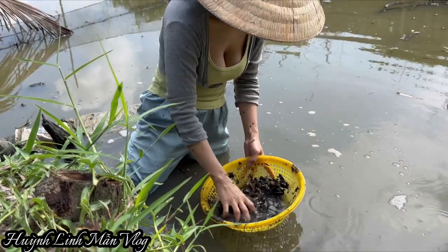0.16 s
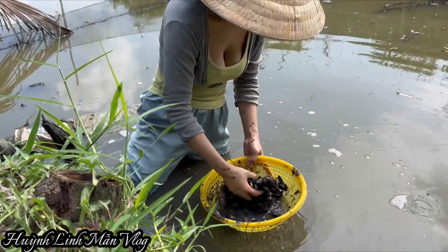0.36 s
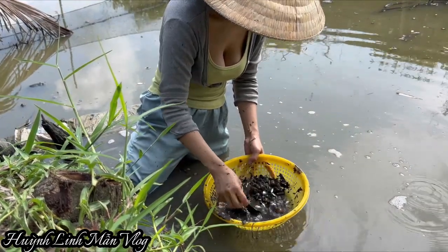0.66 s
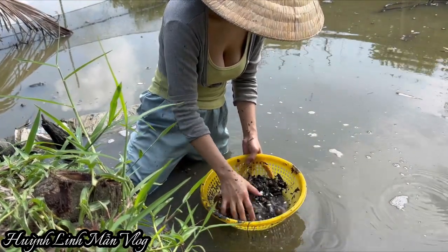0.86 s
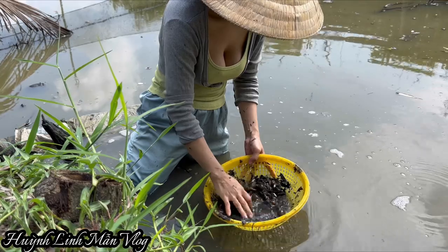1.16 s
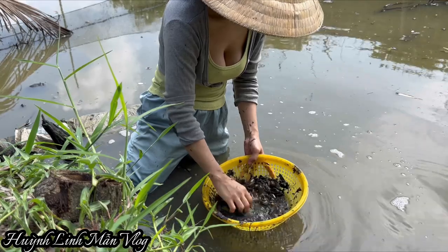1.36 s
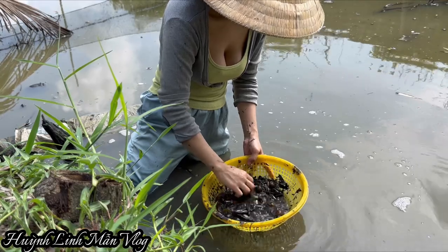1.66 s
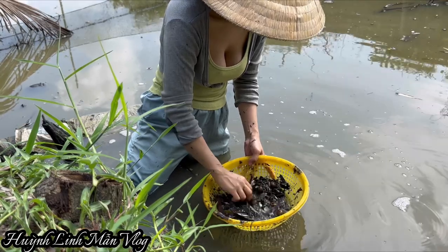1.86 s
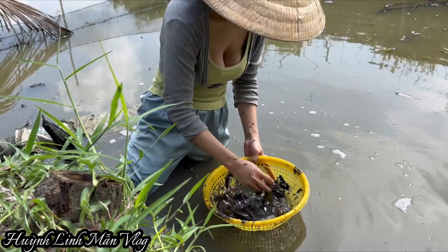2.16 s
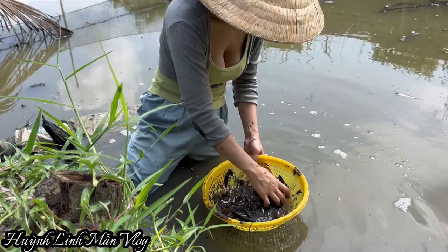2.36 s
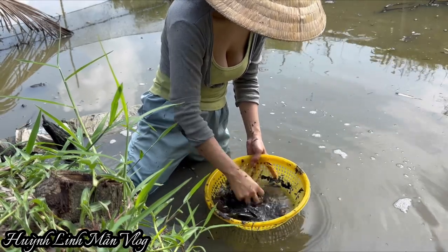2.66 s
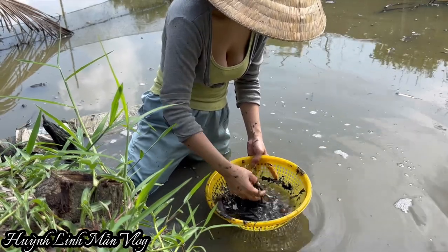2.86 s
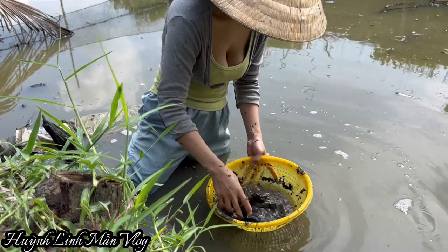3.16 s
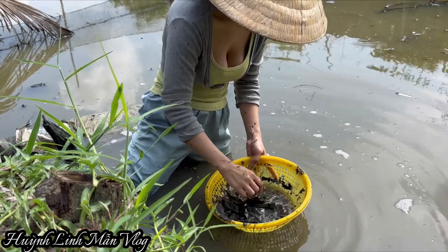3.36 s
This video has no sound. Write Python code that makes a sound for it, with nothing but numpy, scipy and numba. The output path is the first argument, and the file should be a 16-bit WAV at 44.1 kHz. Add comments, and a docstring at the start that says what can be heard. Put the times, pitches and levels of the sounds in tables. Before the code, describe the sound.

Mud is worked by hand in a basket at a pond, close to the microphone, clicking and popping in bursts; early bird whistles, a far motor winding down, later a faint rasping call.

```python
"""A shallow pond, close by: hands knead mud in a plastic basket.
Wet clicks, pops and crackle come in bursts, built from swelling, dying sines and short cracks of hiss.
A small engine drones far off and slows: wavering multiples of its firing rate over rumble noise.
Birds call from the banks as gliding sines and a rasp of resonant noise; the air is soft coloured hiss.
A gain control dips the level after loud peaks and recovers in a quick and a slow part."""
import sys
import numpy as np
from scipy import signal
from scipy.fft import rfft, irfft
from scipy.io import wavfile
from scipy.ndimage import uniform_filter1d
from numba import njit

SR = 44100
rng = np.random.default_rng(int(sys.argv[2]) if len(sys.argv) > 2 else 0)


def store_pcm(level_fs):
    """Save levels as 16-bit WAV."""
    pcm = np.round(np.clip(level_fs, -1, 1) * 32767).astype(np.int16)
    wavfile.write(sys.argv[1], SR, np.atleast_2d(pcm).T)


N = 154350

# far engine: t/s, firing rate f/Hz, level/dB, tones against rumble level/dB
ENGINE_RUN = [(0, 37.14, -26, -6), (.12, 37.65, -31, 4), (.47, 38.74, -28, 1.5), (.58, 38.49, -28.5, 1),
              (.9, 39.5, -28, 0), (1.3, 40, -27, -2), (1.45, 37.38, -29, 1.5), (1.7, 32.06, -28.5, -2),
              (1.9, 27.5, -30, 1.5), (2.1, 24.16, -30.5, 3), (2.45, 20.96, -29.5, -6.5),
              (3.5, 22.03, -32, -5)]
# engine tones: multiple of the firing rate, relative level/dB
ENGINE_ORDERS = [(2, 5), (3, -5), (4, -14), (5, -19.5), (6, -12), (8, -22), (9, -25)]
# change of each multiple once off the throttle: level/dB
COASTING_CHANGES = [-12.5, 5, 12.5, 14, -11.5, -10, -15.5]
COASTING_S, COASTING_FADE_S = 1.228, 0.57  # start and length of the change
ENGINE_WAVER_DB = 3
# spectrum of the engine's rumble: f/Hz, density level/dB
RUMBLE_SPECTRUM = [(24, -36), (36, -0.5), (55, 0.5), (70, 2.5), (125, -1.5), (150, -7.5), (183, -9.5),
                   (247, -14.5), (410, -23.5), (700, -28.5), (910, -35.5), (1540, -120)]
RUMBLE_DB = -3  # against the engine's level
# spectrum of the air hiss: f/Hz, density level/dB
AIR_SPECTRUM = [(240, -37), (400, 8.5), (852, -20.5), (906, -8), (1990, -15), (3070, -9.5), (3530, -10),
                (4880, -18), (6150, -5), (10400, -35), (16000, -5)]
AIR_DB = -49
# whistled calls: start t/s, length t/s, base pitch f/Hz, base level/dB
WHISTLE_CALLS = [(-.14, 0.2, 1292, -29.5), (0.125, .19, 1304, -29.5), (0.386, .2, 1304, -28.5),
                 (0.663, 0.17, 1219, -30)]
# contour within one call: share of its length, pitch ratio, added level/dB
WHISTLE_CONTOUR = [(0, .87, -16), (0.091, .96, -0.5), (0.2, 1.01, 6.5), (0.299, .98, 2.5), (.41, .89, -0.5),
                   (0.521, 1.02, 2.5), (.62, 1.13, 12), (.76, .96, 5), (.92, 0.8, -10), (1, 0.65, -34)]
WHISTLE_PAN_DB, WHISTLE_PHASE = -5, -2.88  # left over right; radians by which left leads
WHISTLE_ECHO_DB, WHISTLE_ECHO_S = -11, 0.41  # echo level; time to fall 60 dB
# squelches, each a swarm of bubbles: start t/s, length t/s, level/dB, centre pitch f/Hz
SQUELCH_SWARMS = [(-.1, 0.94, -49.5, 2216), (0.404, 0.19, -37.5, 3100), (0.883, 0.3, -42.5, 2460),
                  (1.137, 0.21, -37, 2620), (1.274, 0.2, -44, 1785), (1.458, 0.48, -50, 2815),
                  (1.776, 0.28, -56.5, 1567), (2.276, 0.086, -43.5, 2490), (2.349, 0.2, -37.5, 3290),
                  (2.489, 0.12, -35.5, 3380), (2.54, 0.47, -50, 3180), (2.81, 0.15, -55, 2810),
                  (3.118, 0.086, -46, 2840), (3.38, 0.33, -51.5, 3604)]
SEEP_DB, SEEP_HZ = -59, 3000  # crackle that goes on between squelches
GRAINS_PER_S, GRAIN_SPREAD_DB, GRAIN_OCTAVES = 2600, 3.6, .75
GRAIN_CYCLES, GRAIN_RISE = 2.8, .71  # typical decay and swell, in cycles
GRAIN_GLIDE = .012  # pitch climb per cycle, as a share
SCATTER_DB = -1.5  # left-right spread
FIZZ_DB, FIZZ_HZ = -4, 10500  # ticks: level against the bubbles, middle pitch
# wet clicks and pops: t/s, ring level/dB, pitch f/Hz, crack level before its lift/dB, cycles to fall to 1/e^2
POP_HITS = [(0.187, -15, 653, -61, 4.5), (0.203, -13.5, 1310, -43.5, 2.1), (0.303, -1, 2180, -46, 2.4),
            (0.379, -33, 1380, -37.5, 2.9), (0.407, -41, 1320, -38.5, 3.3), (0.439, -20, 1800, -50, 1.5),
            (0.455, -22, 3500, -42, 3.3), (.491, -20.5, 730, -40, 5.4), (.4985, -9, 4500, -15, 3.6),
            (0.542, -27, 1140, -31, 3.8), (0.572, -15.5, 1260, -44, 2.6), (0.733, -23.5, 2470, -47, 5),
            (0.786, -31, 2100, -55, 6), (0.877, -26.5, 721, -43, 3), (0.917, -16.5, 3600, -42, 4.8),
            (0.932, -8, 2400, -36, 1.7), (0.966, -15.5, 1950, -68, 11.7), (1, -20, 1740, -35, 10),
            (1.041, -13, 1310, -60, 2.3), (1.138, -24, 2900, -60, 4.5), (1.157, -9, 1290, -63, 2.1),
            (1.158, -14, 4100, -59, 4.17), (1.173, -22, 1204, -60, 4), (1.196, -21, 1210, -38, 8.4),
            (1.207, -24, 1300, -45, 4.5), (1.212, -19, 2440, -49, 4.2), (1.226, -12.5, 3580, -53, 3.8),
            (1.236, -21, 1270, -54, 4.2), (1.254, -19, 3060, -57, 4.3), (1.279, -14, 4100, -38, 4.6),
            (1.295, -15, 2930, -35, 6.76), (1.2959, -19, 1020, -60, 4.7), (1.318, -25, 1760, -66, 4.7),
            (1.331, -18.5, 1450, -60, 3.7), (1.35, -25, 1302, -61, 6.6), (1.365, -18, 1420, -59, 3.6),
            (1.378, -21, 2250, -60, 6), (1.389, -31, 751, -67, 6.5), (1.563, -28, 2520, -33, 4),
            (1.628, -25, 3060, -56, 4.3), (1.649, -18, 4240, -50, 3.6), (1.674, -20.5, 1750, -41, 4.2),
            (1.683, -36, 8980, -30, 4.3), (1.721, -20.5, 1211, -45, 2.4), (1.738, -17.5, 2670, -53, 2.7),
            (1.81, -21, 1216, -69, 4.6), (1.824, -27, 1870, -71, 4.2), (1.845, -23, 3900, -77, 4),
            (2.193, -12, 9000, -51, 2.9), (2.208, -38, 2600, -34, 4.4), (2.284, -21, 2510, -54, 4.03),
            (2.3, -18.5, 1240, -45, 3.8), (2.309, -19, 2552, -33, 3.3), (2.351, -19, 3800, -51, 4.3),
            (2.363, -4, 4450, -41, 4), (2.369, -14.5, 1420, -24.5, 2.7), (2.378, -8, 5540, -30, 2.6),
            (2.39, -14, 2890, -36, 4.2), (2.421, -19.5, 2400, -43, 4.9), (2.4205, -20, 5560, -52, 5.4),
            (2.43, -15.5, 9020, -28, 5.9), (2.443, -20, 1330, -33.5, 3.74), (2.508, -14, 5170, -29, 3.3),
            (2.512, -10, 4740, -26, 4), (2.525, -12.5, 3140, -24, 4.9), (2.532, -15, 3600, -34, 4.6),
            (2.539, -10, 3110, -35, 6.9), (2.547, -22, 3370, -25, 4), (2.552, -17, 3430, -40, 6),
            (2.572, -19, 4300, -40, 5), (2.651, -23, 4535, -46, 5.6), (2.68, -18, 6260, -41, 5),
            (2.705, -15.5, 4400, -41, 3.7), (2.714, -19, 3900, -44, 4.7), (2.828, 0, 2030, -22.5, 1.6),
            (2.837, -16, 2073, -37, 3.63), (2.973, -32.5, 2600, -49, 7.6), (3.095, -26, 8260, -61, 5),
            (3.112, -29.5, 1767, -49, 4.86), (3.146, -10.5, 3660, -33, 3.6),
            (3.155, -12.5, 8100, -31.5, 3.4), (3.294, -33, 4400, -41.5, 4.5), (3.413, -17.5, 4140, -47, 5),
            (3.436, -17.5, 8440, -42, 8.6), (3.474, -16.5, 4080, -36, 7.3), (3.489, -37, 3500, -36, 4.9)]
CRACK_S, CRACK_RISE_S, CRACK_LIFT_DB = .0013, .0004, 7
# bubbles after each pop: count, mean gap at a 1500 Hz pop (s), pitch spread (octaves), drop per bubble
FOLLOWERS, FOLLOW_S, FOLLOW_OCTAVES, FOLLOW_STEP_DB = 3, .0016, .2, -4
# phase by which left leads right for basket sounds: f/Hz, phase/radians
BASKET_PHASE = [(300, 1), (3000, .5), (7500, 1.75), (9500, -1.5), (11000, -3), (14000, -5.5)]
# chirps: start t/s, length t/s, top f/Hz, end f/Hz, bend exponent, level/dB, left over right level/dB,
# roughness depth (0-1)
CHIRP_CALLS = [(0.336, 0.015, 7410, 2210, 1.75, -24, 4.5, 0.8),
               (0.471, 0.028, 7400, 4920, 0.83, -28, -3, 0.9),
               (1.415, 0.093, 7540, 6500, 1.3, -35.5, 20, 0.12)]
# rasping call: t/s, level/dB
RASP_LEVEL = [(1.85, -41), (1.904, -42), (2.33, -47)]
# its throat resonances: f/Hz, nominal width f/Hz (each filter stage widens it), level/dB
THROAT_PEAKS = [(2548, 97, -4), (2910, 120, -7), (3250, 320, -13.5)]
RASP_PULSES_PER_S = 60
GAIN_TOP_DB, GAIN_RATIO = -11, 10
GAIN_QUICK_S, GAIN_SLOW_S, GAIN_SLOW_SHARE = .04, 4, .45  # the two recoveries; weight of the slow one
TOP_HZ = 15800


def undb(db):
    """Decibels to amplitude."""
    return 10 ** (np.asarray(db) / 20)


def clock():
    """Time of every sample in seconds."""
    return np.arange(N) / SR


def curve(rows, axis=1):
    """One column of a table, drawn along time."""
    return np.interp(clock(), np.array(rows)[:, 0], np.array(rows)[:, axis])


def unit(x):
    """Scale to an RMS of 1."""
    return x / np.sqrt(np.mean(x ** 2))


def log_hz():
    """Log frequency of every spectrum bin."""
    return np.log(np.fft.rfftfreq(N, 1 / SR) + 1)


def colour(x, points):
    """Shape the spectrum of x through (Hz, dB) points."""
    p = np.array(points)
    return irfft(rfft(x) * undb(np.interp(log_hz(), np.log(p[:, 0]), p[:, 1])), N)


def ring(x, hz, width):
    """Pass x through one resonance."""
    return signal.lfilter(*signal.iirpeak(hz, hz / width, SR), x)


def walk(rate):
    """Random levels held 1 / rate s and smoothed twice; spread near 1."""
    k = int(SR / rate)
    steps = np.repeat(rng.standard_normal(N // k + 1), k)
    return 1.49 * uniform_filter1d(uniform_filter1d(steps, k), k)[:N]


def pan(db):
    """Left and right gains that differ by db, left louder when positive."""
    return undb(np.array([db, -np.asarray(db)]) / 2)


def turn(x, radians):
    """Let left lead right by a phase."""
    return irfft(rfft(x) * np.exp(.5j * np.array([radians, -radians]).reshape(2, -1)), N)


@njit
def grains(n, start, step, cycles, rise, glide, left, right):
    """Bubbles: quickly swelling, dying sines whose pitch climbs a little every cycle."""
    out = np.zeros((2, n))
    for k in range(len(start)):
        w, phase, level, i = step[k], 0., 1., start[k]
        unrisen, swell = 1., np.exp(-w / (2 * np.pi * rise))
        decay = np.exp(-step[k] / (2 * np.pi * cycles[k]))
        while level > .004 and i < n and w < 2.6:
            sample = (1 - unrisen) * level * np.sin(phase)
            out[0, i] += left[k] * sample
            out[1, i] += right[k] * sample
            phase += w
            level *= decay
            i += 1
            unrisen *= swell
            w *= 1 + glide * w / (2 * np.pi)
    return out


def scatter(s, hz, cycles, db, pan_db):
    """Place one bubble per entry in time, pitch, decay, level and pan."""
    left, right = undb(db) * pan(pan_db)
    step = 2 * np.pi * np.clip(hz, 200, 15000) / SR
    cycles = np.clip(cycles, .3, 40)
    return grains(N, (s * SR).astype(np.int64), step, cycles, GRAIN_RISE, GRAIN_GLIDE, left, right)


def engine():
    """Far engine: wavering multiples of the firing rate over a broad rumble."""
    phase = 2 * np.pi * np.cumsum(curve(ENGINE_RUN) * (1 + 0.008 * walk(6.035))) / SR
    coasting = np.clip((clock() - COASTING_S) / COASTING_FADE_S, 0, 1)
    tones = 0
    for (k, db), change in zip(ENGINE_ORDERS, COASTING_CHANGES):
        level = undb(db + coasting * change + ENGINE_WAVER_DB * walk(11.89))
        tones = tones + level * np.sin(k * phase + k * k)
    mid, side = (colour(rng.standard_normal(N), RUMBLE_SPECTRUM) for _ in range(2))
    # the lowest rumble is nearly alike left and right
    side = colour(side, [(50, -38), (150, -6.5), (350, -0.5), (600, -1.0)]) * np.array([[1], [-1]])
    rumble = undb(RUMBLE_DB) * (mid + side) / np.std(mid)
    clarity = undb(curve(ENGINE_RUN, axis=3))
    return undb(curve(ENGINE_RUN, axis=2)) * (clarity * unit(tones) + rumble) * pan(1.7)[:, None]


def air():
    """Soft outdoor hiss: coloured noise that flickers in level, partly unlike left and right."""
    mid, side = (unit(colour(rng.standard_normal(N), AIR_SPECTRUM)) for _ in range(2))
    flicker = undb(1.5 * walk(6))
    return flicker * undb(AIR_DB) * (mid + 0.61 * side * np.array([[1], [-1]]))


def whistles():
    """Whistling bird: near-sine calls stronger on the right, with a faint echo off the banks."""
    t, calls = clock(), 0
    share, ratio, added_db = np.array(WHISTLE_CONTOUR).T
    for s, length, hz, db in WHISTLE_CALLS:
        u = (t - s) / length
        glide, swell_db = (uniform_filter1d(np.interp(u, share, row), int(.008 * SR))
                           for row in (ratio, added_db))
        tone = np.sin(2 * np.pi * np.cumsum(hz * glide) / SR)
        calls = calls + (u > 0) * (u < 1) * undb(db + swell_db) * tone
    # the echo is a decaying burst of noise, different in each ear
    tail = rng.standard_normal((2, SR // 2)) * undb(-60 * t[:SR // 2] / WHISTLE_ECHO_S)
    tail = tail / np.sqrt(np.sum(tail ** 2, axis=1, keepdims=True))
    echo = signal.fftconvolve(calls[None], tail)[:, :N]
    direct = turn(calls, WHISTLE_PHASE) * pan(WHISTLE_PAN_DB)[:, None]
    return direct + undb(WHISTLE_ECHO_DB) * echo


def crackle():
    """Clumps of tiny bubbles and high ticks, swelling with each squelch."""
    count = int(GRAINS_PER_S * N / SR)
    u, z = rng.random((count, 3)).T, rng.standard_normal((count, 4)).T
    s = u[0] * (N - 1) / SR
    start, length, db, hz = np.array(SQUELCH_SWARMS).T[:, :, None]
    progress = np.clip((s - start) / length, 0, 1)
    swell = undb(db) * np.sin(np.pi * progress ** .6).clip(0) ** 1.2  # peaks early
    level = swell.sum(axis=0) + undb(SEEP_DB)
    centre = ((swell * hz).sum(axis=0) + undb(SEEP_DB) * SEEP_HZ) / level
    clumps_db = 3.5 * walk(40)[(s * SR).astype(int)]
    # many faint grains, few loud ones
    bubble_db, tick_db = 20 * np.log10(level) + clumps_db - GRAIN_SPREAD_DB * np.log(1 - .99 * u[1:])
    pitch = centre * 2 ** (GRAIN_OCTAVES * z[0])
    cycles = GRAIN_CYCLES * 2.07 ** z[1].clip(-2, 1.3)
    pan_db = SCATTER_DB * z[2]
    bubbles = scatter(s, pitch, cycles, bubble_db + 1.76 * z[0], pan_db)
    ticks = scatter(s, FIZZ_HZ * 2 ** (1.2 * z[3]), np.full(count, 9.6), tick_db + FIZZ_DB, pan_db)
    return bubbles + ticks


def pops():
    """Each pop is a short bubble ring with a treble crack; quieter, mostly higher bubbles follow."""
    s, db, hz, crack_db, cycles = np.array(POP_HITS).T
    z = rng.standard_normal((1 + FOLLOWERS, len(s)))
    gaps = rng.random((FOLLOWERS, len(s)))
    pan_db, t = SCATTER_DB * z[0], clock()[:1024]
    hits = np.zeros((2, N))
    hits[:, (s * SR).astype(int)] = undb(crack_db + CRACK_LIFT_DB) * pan(pan_db)
    shape = np.exp(-t / CRACK_S) * (1 - np.exp(-t / CRACK_RISE_S)) ** 2
    treble = [(2000, -4), (5000, 1), (9000, -1), (11500, 1.5), (13000, 3), (15000, -6)]
    hiss = unit(colour(rng.standard_normal(N), treble))
    cracks = signal.fftconvolve(hits, shape[None] / shape.max())[:, :N] * hiss
    out = scatter(s, hz, cycles / 2, db, pan_db) + cracks
    for k, late in enumerate(np.cumsum(FOLLOW_S * (.5 + gaps), axis=0)):
        when = s + late * 3000 / (hz + 1500)  # sooner after high pops
        pitch = hz * 2 ** (FOLLOW_OCTAVES * (z[k + 1] + .5))
        out = out + scatter(when, pitch, cycles / 2, db + FOLLOW_STEP_DB * (k + 1), pan_db)
    return out


def chirps():
    """High bird chirps: a quick flick up, then a falling sine with a rough level."""
    t, out = clock(), 0
    for s, length, top_hz, end_hz, bend, db, pan_db, rough in CHIRP_CALLS:
        u = np.clip((t - s) / length, 0, 1)
        hz = top_hz - (top_hz - end_hz) * u ** bend - 900 * np.exp(-u / 0.061)
        level = (1 + rough * walk(1500)) * undb(db - 45 * u ** 3) * np.sin(np.pi * u) ** .5
        out = out + level * np.sin(2 * np.pi * np.cumsum(hz) / SR) * pan(pan_db)[:, None]
    return out


def rasp():
    """Rasping call: noise throbbing through three throat resonances."""
    phase = np.cumsum(RASP_PULSES_PER_S * (1 + 0.24 * walk(4.7))) / SR % 1
    puffs = np.exp(-phase / 1.6) * rng.standard_normal(N)
    start, end = RASP_LEVEL[0][0], RASP_LEVEL[-1][0]
    gate = np.interp(clock(), [start, start + 0.073, end - .04, end], [0, 1, 1, 0])
    voice = sum(undb(db) * ring(ring(puffs, hz, 1.9 * w), hz, 1.5 * w) for hz, w, db in THROAT_PEAKS)
    return gate * undb(curve(RASP_LEVEL)) * unit(voice)


def scene():
    """Mix the layers, with the basket sounds turned in phase between left and right."""
    hz, radians = np.array(BASKET_PHASE).T
    lead = np.interp(log_hz(), np.log(hz), radians)
    basket = turn(crackle() + pops(), lead)
    return engine() + air() + whistles() + basket + chirps() + rasp()


@njit
def hold(over, quick, slow, share):
    """Gain cut that jumps up with the peaks and lets go in a quick and a slow part."""
    out, a, b = np.empty(len(over)), 0., 0.
    for i in range(len(over)):
        a, b = max(over[i], a * quick), max(over[i], b * slow)
        out[i] = (1 - share) * a + share * b
    return out


def record(dry):
    """Gain control ducks after loud peaks, which are rounded; the extreme treble is cut."""
    peak_db = 20 * np.log10(np.abs(dry).max(axis=0) + 1e-9)
    over = np.maximum(peak_db - GAIN_TOP_DB, 0) * (1 - 1 / GAIN_RATIO)
    quick, slow = np.exp(-1 / (GAIN_QUICK_S * SR)), np.exp(-1 / (GAIN_SLOW_S * SR))
    cut_db = hold(over, quick, slow, GAIN_SLOW_SHARE)
    cut_db = signal.lfilter([.01], [1, -.99], cut_db)  # softens the jumps, so snaps pass first
    rounded = np.tanh(dry * undb(-cut_db))
    return signal.sosfilt(signal.ellip(8, .2, 70, TOP_HZ, fs=SR, output="sos"), rounded)


dry = scene()
out = record(dry)
store_pcm(out)
```